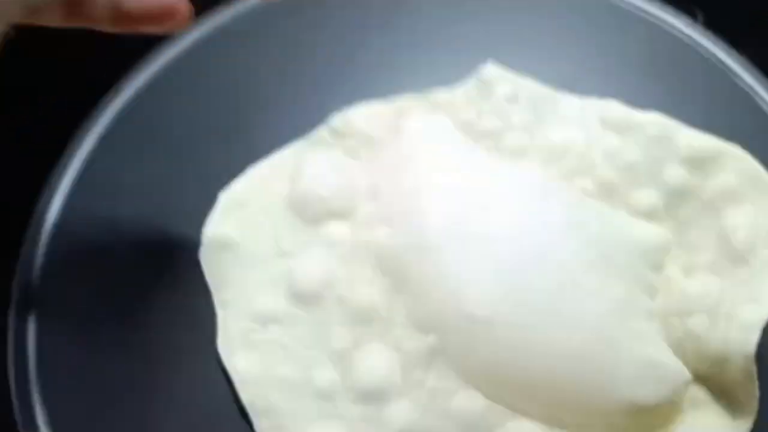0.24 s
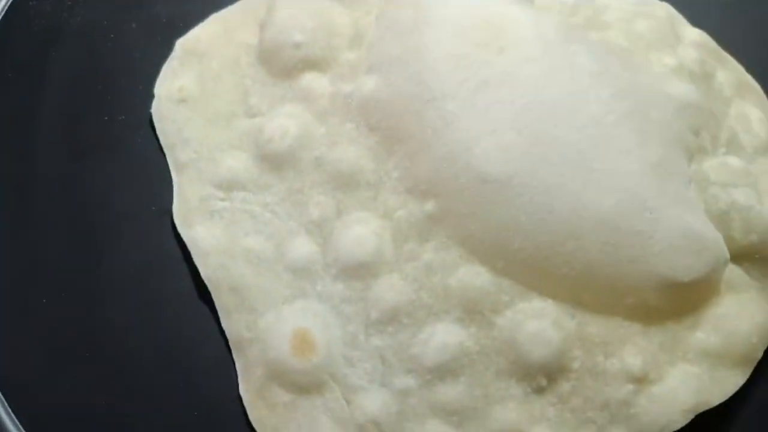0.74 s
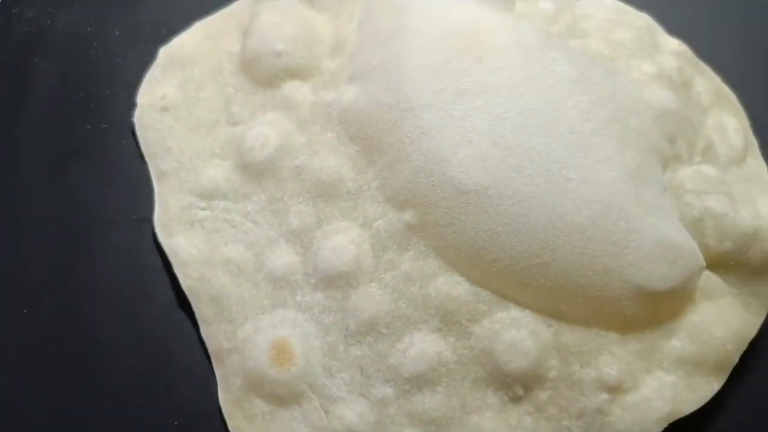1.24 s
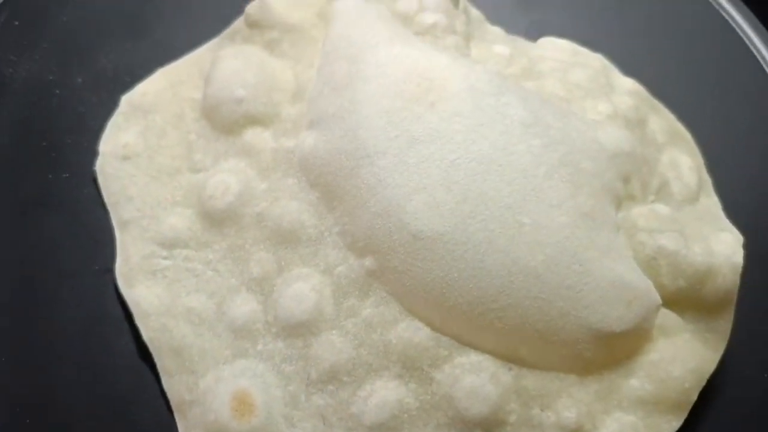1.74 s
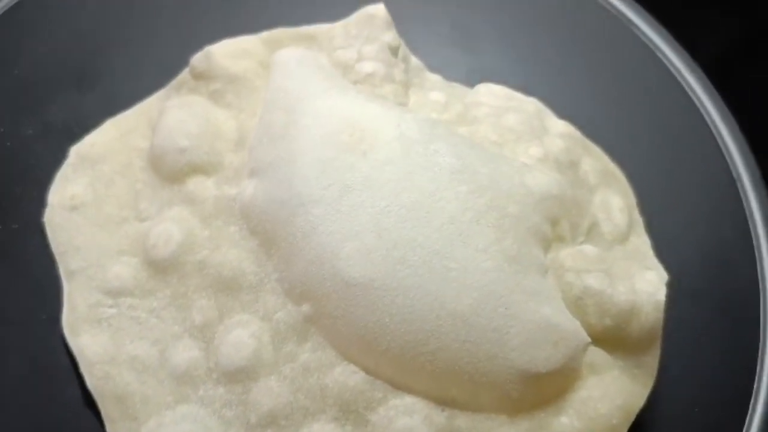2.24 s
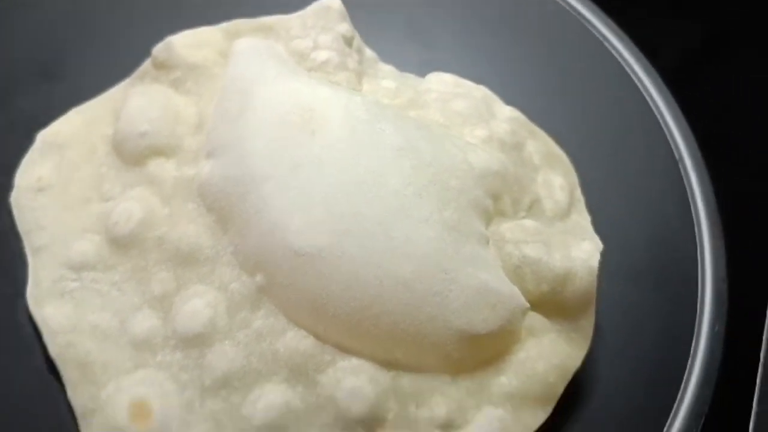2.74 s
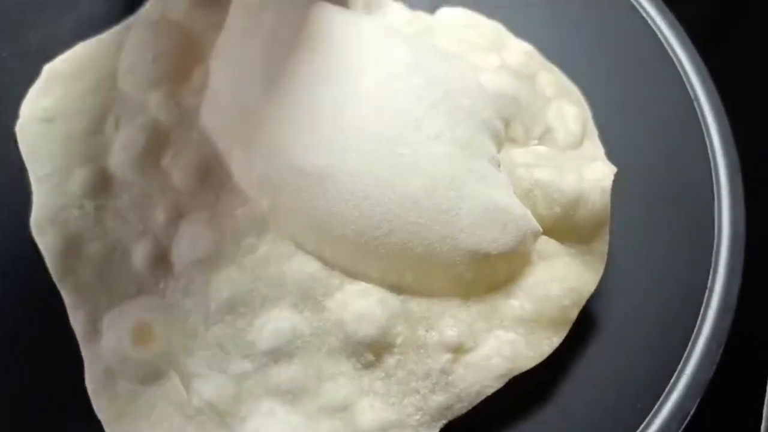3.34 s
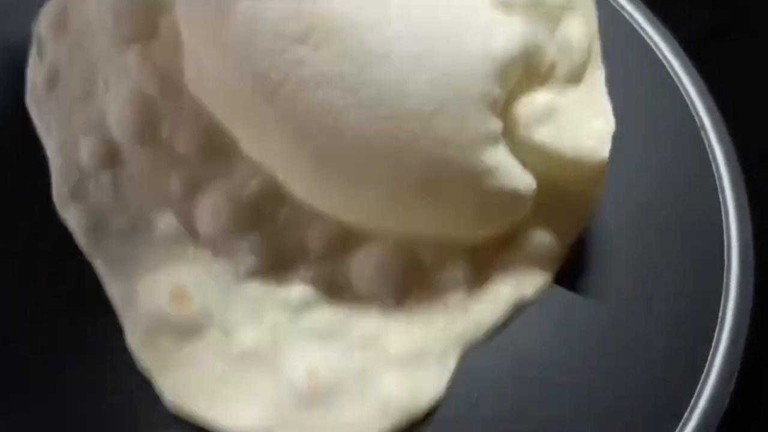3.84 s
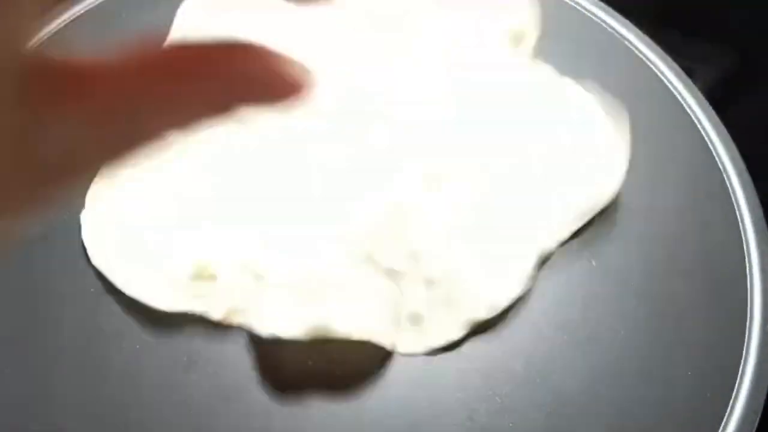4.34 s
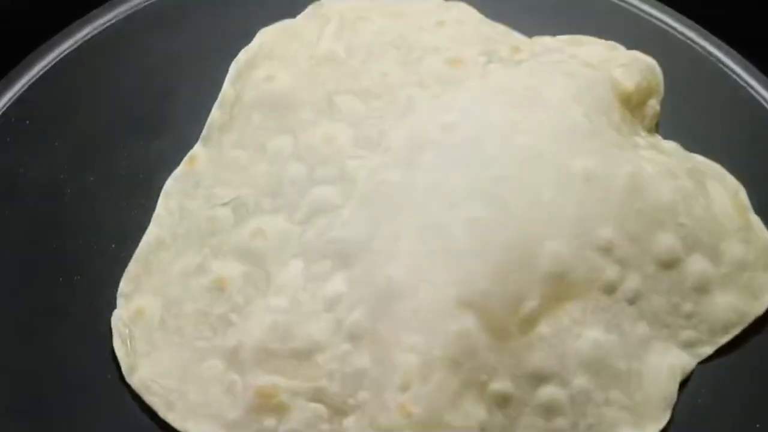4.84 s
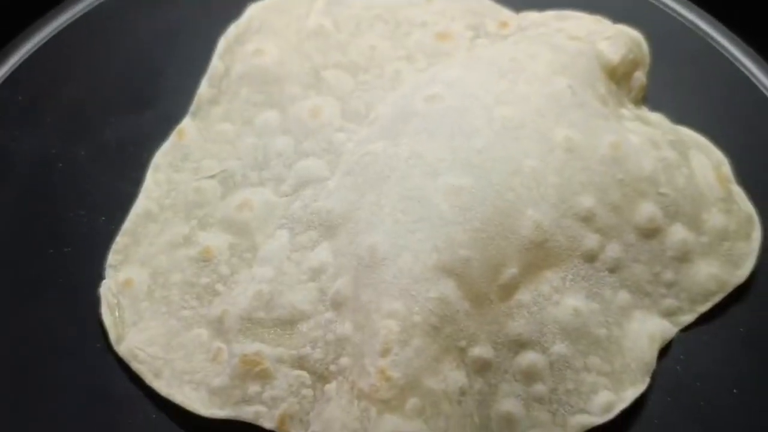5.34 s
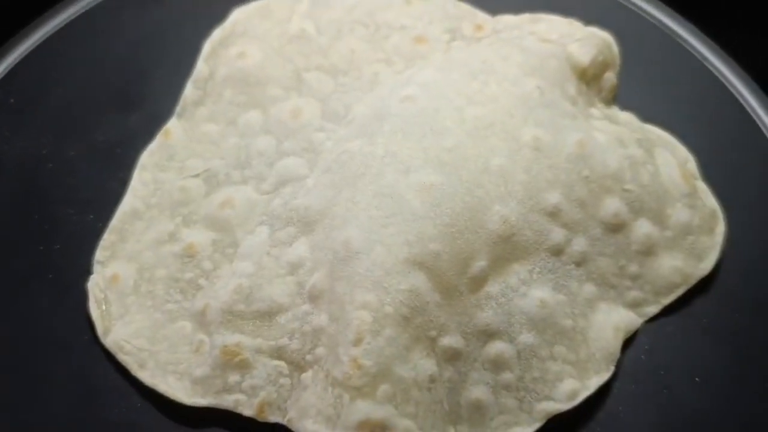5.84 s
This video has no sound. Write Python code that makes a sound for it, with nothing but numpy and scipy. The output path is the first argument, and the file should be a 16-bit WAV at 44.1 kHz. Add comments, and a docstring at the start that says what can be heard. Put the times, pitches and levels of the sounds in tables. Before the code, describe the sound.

Rapid metallic pan tapping with a low ringing hum, broken by two sharp dough smacks and a dry scraping rustle before the second.

```python
"""A pan rocks by itself on a hob, tapping about eleven times a second: metal modes, rattle and hum.
A hand rubs softly as it handles a flatbread, then slaps it down: sharp smacks of short rings and
noise cracks, a boom, soft contact noise, a steam puff. The jolted pan rocks slower for a moment.
Faint fizzes of filtered noise escape now and then. Later the bread is dragged off in dry noise strokes
with a rising rasp, then slapped down again. Over kitchen air, a faint low tone swells near the end."""
import sys
import numpy as np
from scipy import signal
from scipy.fft import rfft, irfft
from scipy.io import wavfile

SR = 44100
rng = np.random.default_rng(int(sys.argv[2]) if len(sys.argv) > 2 else 0)


def wav_record(signal):
    """Record a signal, one row per channel, as 16-bit PCM in the file named by sys.argv[1]."""
    frames = np.transpose(np.atleast_2d(signal))
    bounded = np.clip(frames, -1, 1)
    # unit amplitude maps onto the largest positive 16-bit level
    quanta = np.round(bounded * 32767).astype(np.int16)
    wavfile.write(sys.argv[1], SR, quanta)


N = 268569
TIME = np.arange(N) / SR
RING = TIME[:SR // 2]  # time axis of one ring, half a second

# the bread slapped down: touch_s, flat_s, touch_level_db, flat_level_db, steam_level_db
SLAPS = [(0.136, 0.179, -29, -38, -38.5), (4.354, 4.38, -27, -42, -38.5)]
# dry rubbing and steam: frequency_hz, level_db (relative)
RUB_COLOUR = [(300, -11.5), (800, -5.5), (1300, 1), (2100, 6), (3200, -1), (5000, -5.5), (7500, -8),
              (10000, -16), (15500, -18)]


def undb(db):
    """Decibels to gain."""
    return 10 ** (np.asarray(db) / 20)


def sides(pan_db):
    """Left and right gains for a left-minus-right level difference."""
    return undb(np.array([[.5], [-.5]]) * pan_db)


def curve(rows):
    """Automation curve: breakpoints (time in s, value) joined by straight lines."""
    times, values = np.transpose(rows)
    return np.interp(TIME, times, values)


def bell(s, half_s):
    """A smooth swell around a time, down to 1/e at half_s on either side."""
    return np.exp(-((TIME - s) / half_s) ** 2)


def fade(t60):
    """Exponential decay that falls 60 dB in t60 seconds."""
    return np.exp(-np.log(1000) * RING / t60)


def onset(rise_s):
    """Exponential attack with a time constant in seconds."""
    return 1 - np.exp(-RING / rise_s)


def mode(hz, t60, build_cycles=4):
    """A dying sine that takes a few cycles to build."""
    return np.sin(2 * np.pi * hz * RING) * fade(t60) * onset(build_cycles / hz)


def spectrum(points, hz):
    """Level in dB of a colour table, read on a log-frequency axis."""
    f, db = np.transpose(points)
    return np.interp(np.log(hz + 1), np.log(f), db)


def noise(colour, size=N, spread_hz=1500, grain_db=0):
    """Coloured, grainy stereo noise of rms 1; its stereo width grows with frequency."""
    # left minus right of the noises: frequency_hz, balance_db
    balance = [(200, 1), (700, 0.5), (1300, -3), (2400, -6), (4400, -2.5), (7300, 3.5), (9200, -6.5),
               (15000, 1)]
    hz = np.arange(size // 2 + 1) * SR / size
    # random level boosts, each held for 16 samples
    sizes = np.minimum(rng.exponential(size=size // 16 + 1), 4)
    grains = undb(grain_db * np.repeat(sizes, 16)[:size])
    mid, side = rfft(rng.standard_normal((2, size)) * grains)
    width = hz / (hz + spread_hz)
    pair = mid + side * np.array([[1], [-1]]) * width
    gains = undb(spectrum(colour, hz)) * sides(spectrum(balance, hz))
    y = irfft(pair * gains, size)
    return y / np.sqrt(np.mean(y ** 2))


def part(x, hz, kind):
    """The lows or the highs of a sound, filtered without phase shift."""
    return signal.sosfiltfilt(signal.butter(2, hz, kind, fs=SR, output="sos"), x)


def brighten(x, db, hz=4200):
    """Treble shelf; negative dB dulls the sound."""
    return x + (undb(db) - 1) * part(x, hz, "high")


def catching(depth_db, rate_hz):
    """The level jumps about as a soft contact catches and lets go."""
    steps = np.arange(N) * rate_hz / SR
    return undb(depth_db * np.interp(steps, np.arange(N), rng.standard_normal(N)))


def add(out, s, sound):
    """Mix a sound in at a time."""
    i = max(int(s * SR), 0)
    out[:, i:i + sound.shape[-1]] += sound[..., :N - i]


def play(taps, ring):
    """Sound a ring at every tap."""
    return signal.fftconvolve(taps, np.atleast_2d(ring))[:, :N]


def room(x, wet_db=-12, t60=0.35, rise_s=0.0027):
    """Short, diffuse kitchen echo: convolution with decaying noise."""
    colour = [(100, 16), (2500, 0.5), (15000, -9)]  # Hz, dB
    tail = noise(colour, size=len(RING)) * fade(t60) * onset(rise_s)
    tail = tail / np.sqrt(np.sum(tail ** 2) / 2)
    mono = x.mean(axis=0, keepdims=True)
    return x + undb(wet_db) * signal.fftconvolve(mono, tail)[:, :N]


def kitchen(air_db=-61, tone_hz=216, tone_db=-64, tone_s=5.43, half_s=0.11):
    """Still air as steady noise, in which a faint low sine swells once."""
    # quiet kitchen air: frequency_hz, level_db (relative, per Hz)
    air_colour = [(20, -4), (50, -2), (110, -0.5), (300, -5), (600, -11), (1000, -12), (2300, -14),
                  (4000, -17), (7500, -23), (9500, -28), (15500, -27.5)]
    tone = np.sin(2 * np.pi * tone_hz * TIME) * bell(tone_s, half_s)
    return undb(air_db) * noise(air_colour, spread_hz=36) + undb(tone_db) * tone


def fizzes(grain_db=1.0, lowest_hz=2150):
    """Steam slips out under the rim of the bread: short swells of high-passed noise."""
    # small fizzes: centre_s, level_db (before the high-pass), half_length_s
    fizz_events = [(0.624, -52, 0.015), (1.345, -53.5, 0.023), (2.074, -52.5, 0.017), (2.816, -57, 0.049),
                   (4.285, -51, 0.015), (5.507, -56.5, 0.055)]
    swell = sum(undb(db) * bell(s, half_s) for s, db, half_s in fizz_events)
    return swell * part(noise(RUB_COLOUR, grain_db=grain_db), lowest_hz, "high")


def puffs(grain_db=0.5, treble_db=-1, pan_db=-3, after_s=0.1, half_s=0.032):
    """Steam is squeezed out through the gap under the freshly landed bread, a noise swell."""
    # hissing steam: frequency_hz, level_db (relative)
    puff_colour = [(300, -12), (1000, -6), (1500, 4.5), (2050, 5.5), (2700, -4.5), (4500, -6), (7500, -12),
                   (10000, -21.5), (15500, -24)]
    # each puff follows once the bread lies flat
    swell = sum(undb(db) * bell(flat_s + after_s, half_s) for _, flat_s, _, _, db in SLAPS)
    hiss = noise(puff_colour, spread_hz=460, grain_db=grain_db)
    return swell * brighten(hiss, treble_db) * sides(pan_db)


def rubbing(grain_db=2.0, sharpness=1.48, brighten_db_per_s=11):
    """Friction noise in strokes that swell, ease and brighten: a hand on the bread, then crust on the pan."""
    # soft rubbing strokes, the first the hand handling the bread, the rest crust on the pan:
    # start_s, end_s, level_db, treble_db (at mid-stroke)
    strokes = [(-.02, 0.15, -55.5, 5), (3.384, 3.545, -44.5, -1), (3.526, 3.721, -47, 0.5),
               (3.703, 3.95, -41, -1), (3.834, 4.122, -45, 6.5)]
    grains = noise(RUB_COLOUR, spread_hz=480, grain_db=grain_db)
    grains = grains * catching(depth_db=1.4, rate_hz=200)
    out = 0
    for start, end, db, treble_db in strokes:
        along = np.clip((TIME - start) / (end - start), 0, 1)
        speed = 4 * along * (1 - along)  # nought at both ends, 1 midway
        tilt_db = treble_db + brighten_db_per_s * (along - .5) * (end - start)
        out = out + undb(db) * speed ** sharpness * brighten(grains, tilt_db)
    return out


def rasp(width_hz=1100, centre_s=3.94, half_s=0.058, level_db=-42, centre_hz=4900, octaves_per_s=2.3):
    """A band of friction noise climbs as the last edge of crust speeds up."""
    hz = centre_hz * 2 ** np.clip(octaves_per_s * (TIME - centre_s), -1, 1)
    phase = 2 * np.pi * np.cumsum(hz) / SR
    # low-passed noise moved up to the gliding centre frequency
    inphase, quadrature = part(rng.standard_normal((2, 2, N)), width_hz, "low")
    band = (inphase * np.cos(phase) + quadrature * np.sin(phase)) / inphase.std()
    return undb(level_db) * bell(centre_s, half_s) * band


def thuds(hob_hz=102, t60=0.39, rise_s=0.0075):
    """The weight of the landing bread makes the hob boom briefly, a decaying low sine."""
    # soft weight of the bread: start_s, level_db
    landings = [(0.202, -37), (4.363, -33.5)]
    boom = np.sin(2 * np.pi * hob_hz * RING) * fade(t60) * onset(rise_s)
    out = np.zeros((2, N))
    for s, db in landings:
        add(out, s, undb(db) * boom)
    return out


def flops(grain_db=1.0, rise_s=0.0026, touch_t60=0.45, flat_t60=0.19):
    """Countless small contacts, as noise bursts, when the bread touches down and falls flat."""
    # soft dough meeting metal: frequency_hz, level_db (relative)
    flop_colour = [(25, -8), (50, -11), (85, 0.5), (130, -2), (250, -7.5), (400, 6), (520, -2), (780, 0.5),
                   (1300, -5), (2000, -1.5), (3200, -4.5), (6500, -11.5), (9500, -20.5), (15500, -29)]
    level = np.zeros((1, N))
    for touch_s, flat_s, touch_db, flat_db, _ in SLAPS:
        add(level, touch_s, undb(touch_db) * onset(rise_s) * fade(touch_t60))
        add(level, flat_s, undb(flat_db) * onset(rise_s) * fade(flat_t60))
    level = level * catching(depth_db=1.5, rate_hz=130)
    return level * noise(flop_colour, spread_hz=960, grain_db=grain_db)


def smacks(crack_t60=0.012, rise_s=0.00011, left_lag_s=.00007, lowest_hz=220, crack_pan_share=0.43):
    """Sharp smacks as dough meets the pan, a small tick and a late pan tap: short rings with noise cracks."""
    # dough smacks, with a small tick at 0.44 s and a tap of the pan at 4.56 s:
    # start_s, level_db, ring_hz, ring_t60_s, crack_db (relative to level), left_minus_right_db
    hits = [(0.1138, -27.5, 2100, 0.0064, -24, -3), (0.131, -29, 1900, 0.005, -12, -20),
            (.1355, -22, 668, 0.075, -7, 0), (0.139, -25.5, 1208, 0.049, -15, -5),
            (0.1641, -23.5, 2260, 0.016, -4, -12), (0.1929, -24.5, 2380, 0.04, 0.5, -15),
            (0.1962, -3.5, 2050, 0.0039, -16, -12), (0.4431, -41.5, 2440, 0.0066, -5, -6),
            (4.3501, -18.5, 1890, 0.0016, -11, -10), (4.3542, -24, 1440, 0.0096, -6, -8),
            (4.359, -9, 1840, 0.0027, -11, -5), (4.364, -8, 1600, 0.0033, -5, -2.5),
            (4.3679, -11.5, 1897, 0.017, -37, -12.5), (4.373, -13.5, 1920, 0.005, -42, -23),
            (4.388, -26.5, 1500, 0.0062, 9, -1), (4.399, -14.5, 1740, 0.0091, -5.5, -13),
            (4.564, -38, 1700, 0.017, -14, -16)]
    # crack of a hit: frequency_hz, level_db (relative)
    crack_colour = [(300, -4), (800, -2.5), (1300, -4), (2100, 6), (2800, -7), (4200, -3), (7500, -7),
                    (10000, -16.5), (15500, -17)]
    out = np.zeros((2, N))
    for s, db, hz, t60, crack_db, pan_db in hits:
        # the left lags, as the right side is nearer
        swing = np.sin(2 * np.pi * hz * (RING - np.array([[left_lag_s], [0]])))
        ring = swing * fade(t60) * onset(rise_s) * sides(pan_db)
        crack = noise(crack_colour, size=len(RING)) * fade(crack_t60) * sides(pan_db * crack_pan_share)
        add(out, s, undb(db) * (np.sqrt(2) * ring + undb(crack_db) * crack))
    # the smacks carry little bass
    return signal.sosfilt(signal.butter(2, lowest_hz, "high", fs=SR, output="sos"), out)


def tap_times(settle_s=.26):
    """The pan keeps an even beat, slower just after a jolt; the slowing falls to 1/e in settle_s."""
    # spells of even rocking: first_tap_s, until_s, period_s, added_period_s (from a jolt)
    rocking = [(0.0167, .15, .09, 0), (.3146, .915, .084, .0195), (.957, 2.04, .0868, 0),
               (2.091, 2.83, .0864, 0), (2.8735, 3.53, .087, 0), (3.578, 4.335, .0894, 0),
               (4.64, 5.51, .086, .0145), (5.556, 6.04, .0882, 0)]
    times = []
    for first, until, period, slowing in rocking:
        s = first
        while s < until:
            times.append(s)
            s += period + slowing * np.exp(-((s - first) / settle_s) ** 2)
    return times


def contact(pan_db=-4.5, return_s=.043):
    """Metal bites the hob with a bright, quickly damped tick; the other side lands with a dull knock."""
    # the bite: frequency_hz, t60_s, level_db
    tick_modes = [(2723, 0.011, -42), (1970, 0.017, -39)]
    tick = sum(undb(db) * mode(hz, t60) for hz, t60, db in tick_modes) * sides(pan_db)
    knock = undb(-49.5) * mode(558, 0.034, build_cycles=2.4)
    # the pan rocks back half a beat later
    return tick + np.interp(RING - return_s, RING, knock)


def overtones(count=90, low_hz=2800, high_hz=8600, tilt_db=-4, t60=.19):
    """The crowded, short-lived high modes of the metal, each with its own strength left and right."""
    strengths = rng.uniform(-1, 1, (count, 2, 1))
    ring = 0
    for place, gains in zip(rng.uniform(size=count), strengths):
        hz = low_hz * (high_hz / low_hz) ** place
        ring = ring + mode(hz, t60) * gains * undb(tilt_db * place)
    return ring / np.sqrt(count)


def rocking_pan(ring_db=-57, rattle_db=-51, rattle_t60=0.21, overtone_db=-52,
                scatter_db=-58, scatter_t60=0.16, rise_s=0.00071,
                tap_scatter_db=.5, tap_jitter_s=.0005):
    """Every tap rings the same modes, so taps are near copies and the low modes merge into a hum."""
    # pan and hob ring: frequency_hz, t60_s, level_db (relative), left_minus_right_db, shift_change_db
    pan_modes = [(523, 0.46, -16, 16, 3), (582.7, 0.12, 8, 1.5, 0), (632, 0.13, -13.5, -9, 15),
                 (655, 0.46, -10, -11, -6.5), (721, 0.35, -6, -4, -4.5), (783, 0.33, -8, -7.5, 2),
                 (1128, 0.17, -5.5, 7.5, 1), (1229, 0.19, -4.5, -7, -1.5), (1338, 0.13, -11, 0, -6),
                 (1817, 0.2, 2.5, -13, -2.5), (1851, 0.18, 3.5, -9, 3.5), (2002, 0.14, -9.5, -17, 14.5),
                 (2124, 0.23, -6.5, -11, 12.5), (2303, 0.33, -1.5, -15.5, -5), (2343, 0.5, -16.5, -19, 4),
                 (2390, 0.27, -13, -9, -14), (2593, 0.074, -5.5, -31.5, -8), (2690, 0.24, -5.5, -10, 4),
                 (2770, 0.25, -1, -1, -7), (3180, 0.086, -5.5, -21.5, -1.5), (3380, 0.15, -13.5, -24, -0.5),
                 (4115, 0.26, -15, -5, 8), (4576, 0.14, -21, -10, 4), (6370, 0.37, -16, 12.5, -18),
                 (6970, 0.44, -13, 4, 8.5), (8270, 0.22, -17, -15, 2.5)]
    # dense rattle of each tap: frequency_hz, level_db (relative)
    rattle_colour = [(200, -13.5), (600, 7.5), (950, -3.5), (1500, -4), (1900, 5.5), (2700, -2),
                     (3600, -10), (7500, -14.5), (8800, -22.5), (15500, -24.5)]
    # low modes that ring on from tap to tap: frequency_hz, t60_s, level_db (relative)
    hum_modes = [(417, 0.28, -4), (448.1, 0.36, 3.5)]
    # level of that hum: time_s, level_db
    hum_level = [(0, -52), (.8, -53), (3.2, -53), (4.2, -51), (4.8, -51.5), (5.2, -58), (6.09, -58)]
    # how far the listening point has shifted over the pan: time_s, share (0-1)
    shift_curve = [(0, 0.15), (2.6, 0), (3.3, 0.8), (4.6, 1), (6.09, 1)]

    taps = np.zeros((1, N))
    for s in tap_times():
        early, strength = rng.standard_normal(2)
        add(taps, s - tap_jitter_s * early, undb([tap_scatter_db * strength]))

    rise = onset(rise_s)
    rattle = undb(rattle_db) * noise(rattle_colour, size=len(RING)) * fade(rattle_t60) * rise
    before = after = contact() + rattle + undb(overtone_db) * overtones()
    for k, (hz, t60, db, pan_db, change_db) in enumerate(pan_modes):
        # short waves reach the two sides in or out of step
        left_sign = rng.choice([-1, 1]) if hz > 1000 else 1
        signs = np.array([[left_sign], [1]])
        # neighbouring modes start in opposite directions
        ring = (-1) ** k * mode(hz, t60) * undb(ring_db + db) * sides(pan_db) * signs
        before = before + ring
        after = after + ring * undb(change_db)
    shift = curve(shift_curve)
    ringing = (1 - shift) * play(taps, before) + shift * play(taps, after)

    hum = sum((-1) ** k * undb(db) * mode(hz, t60) for k, (hz, t60, db) in enumerate(hum_modes))
    humming = undb(curve(hum_level)) * play(taps, hum)

    # the contact never lands quite the same way: fresh noise under every tap
    scatter = undb(scatter_db) * play(taps, fade(scatter_t60) * rise) * noise(rattle_colour)
    return ringing + humming + scatter


def scene():
    """Bread, rocking pan and kitchen; only the smacks get the room echo."""
    bread = room(smacks()) + thuds() + flops() + puffs() + rubbing() + rasp() + fizzes()
    return rocking_pan() + bread + kitchen()


def record(dry, top_hz=15900):
    """Hard-limit the peaks, then cut the top with a steep low-pass."""
    held = np.clip(dry, -.88, .88)
    return signal.sosfilt(signal.ellip(10, .2, 70, top_hz, fs=SR, output="sos"), held)


dry = scene()
out = record(dry)
wav_record(out)
```